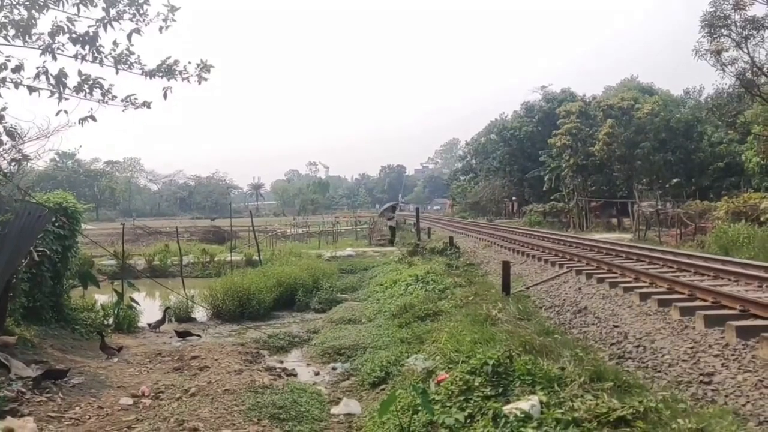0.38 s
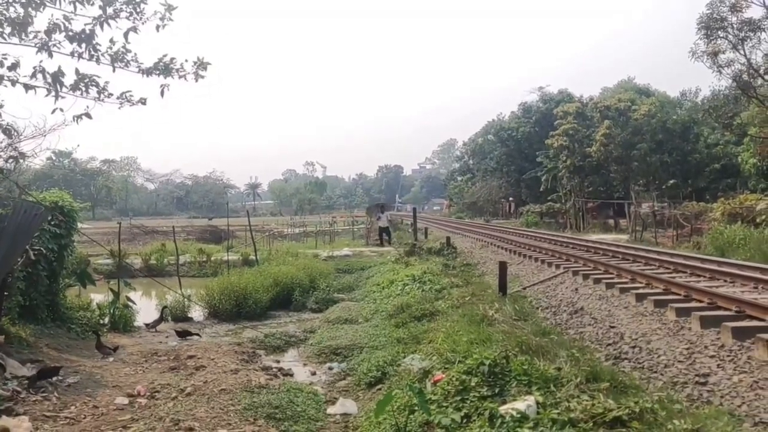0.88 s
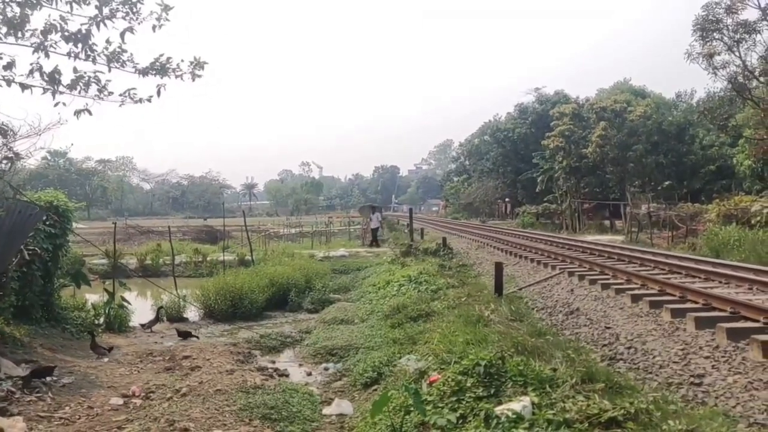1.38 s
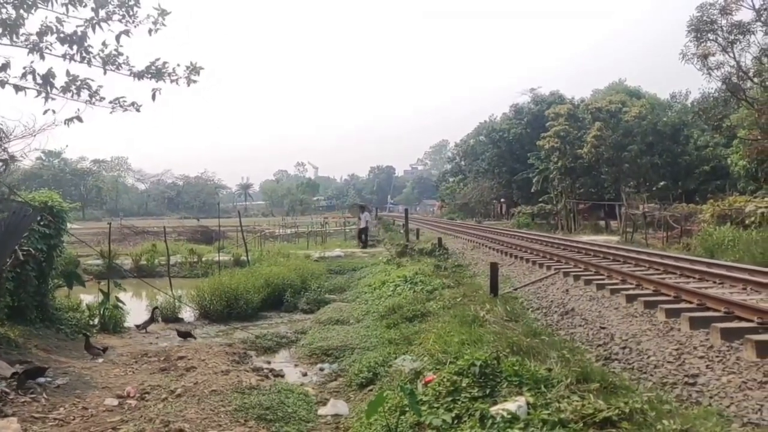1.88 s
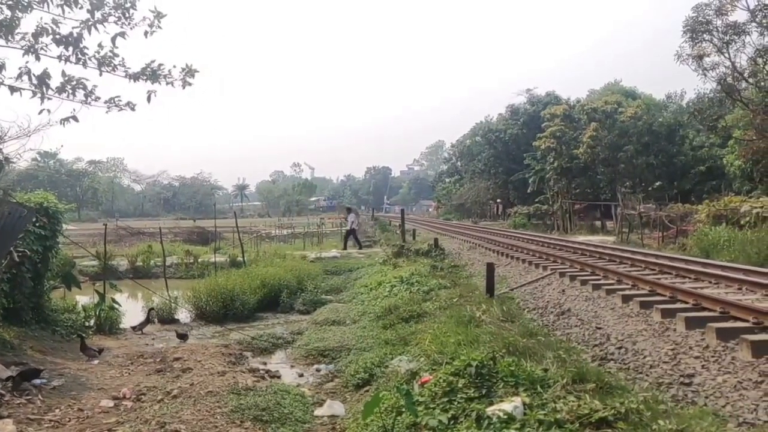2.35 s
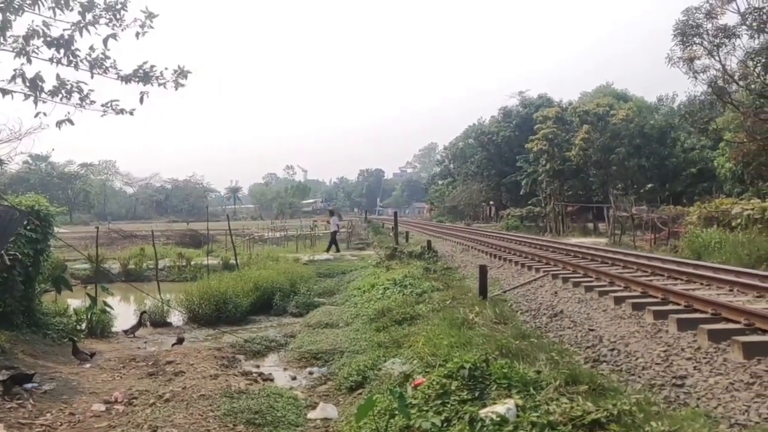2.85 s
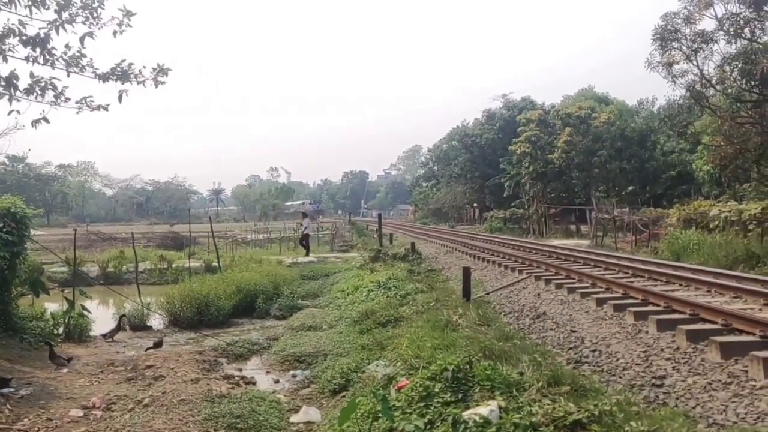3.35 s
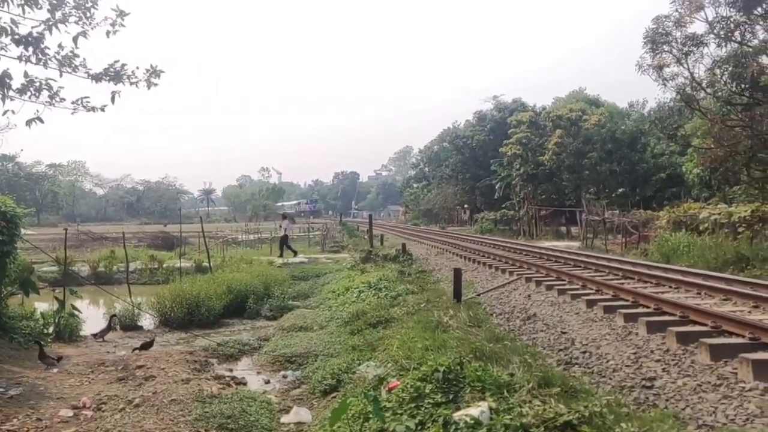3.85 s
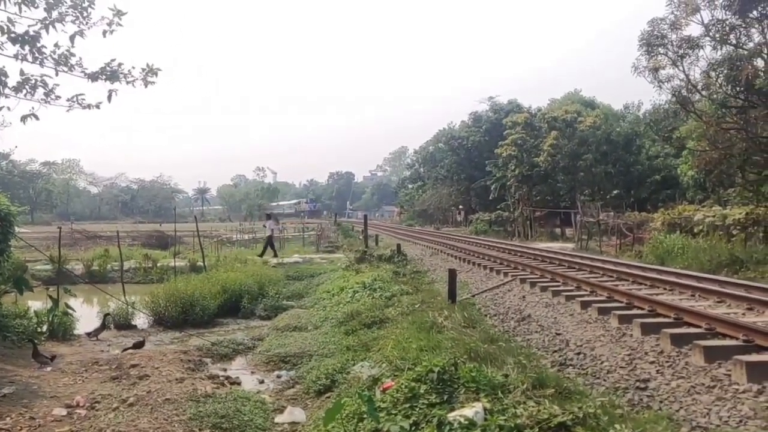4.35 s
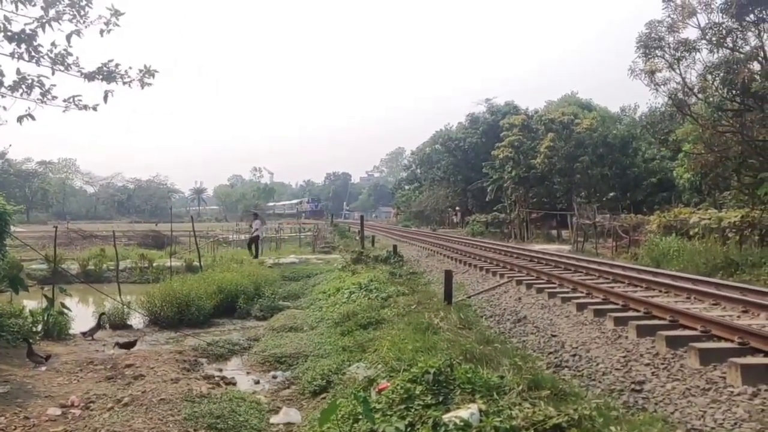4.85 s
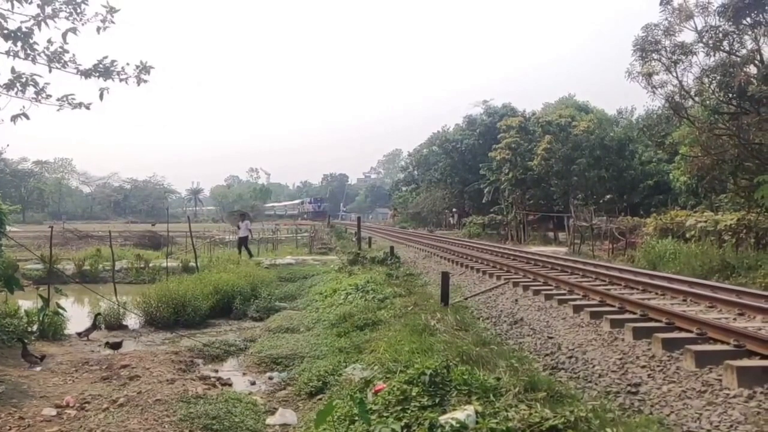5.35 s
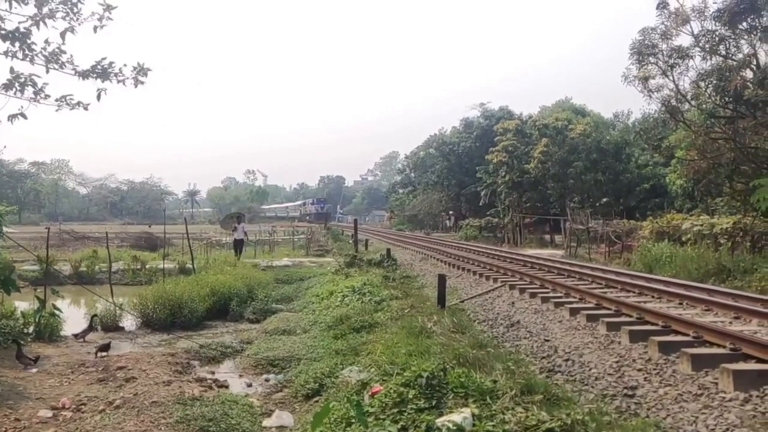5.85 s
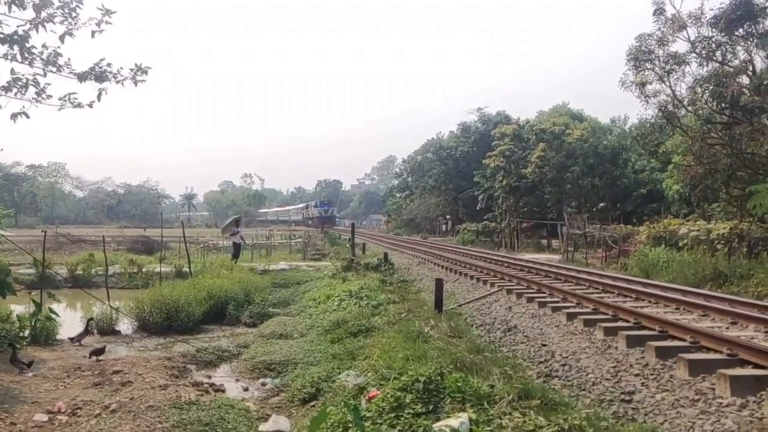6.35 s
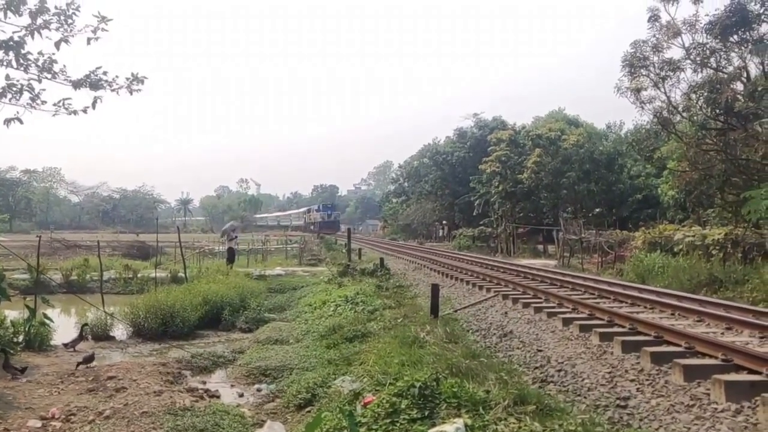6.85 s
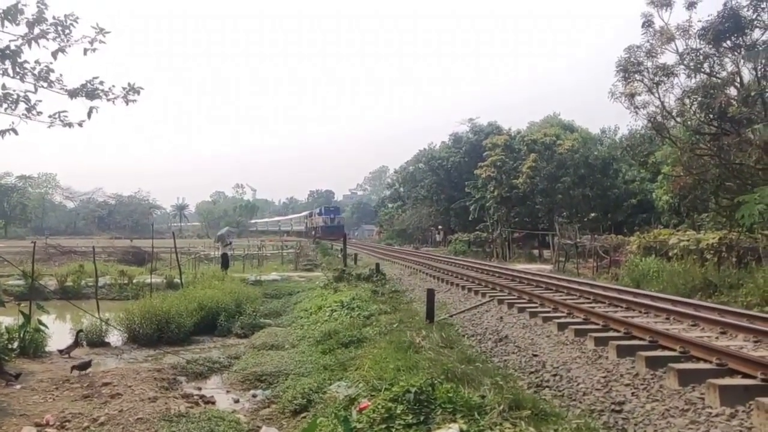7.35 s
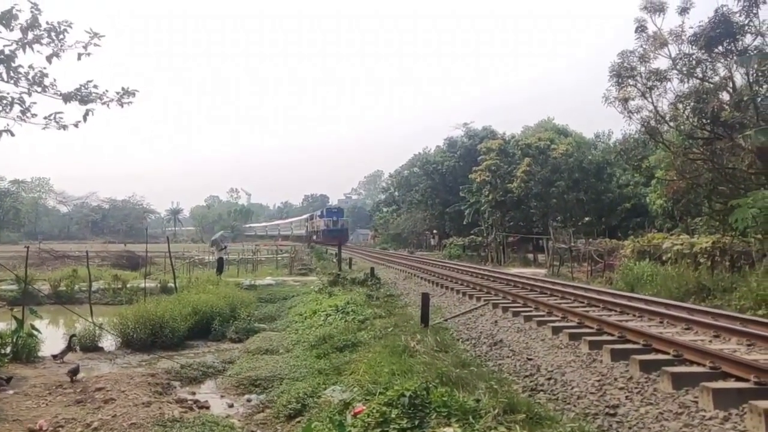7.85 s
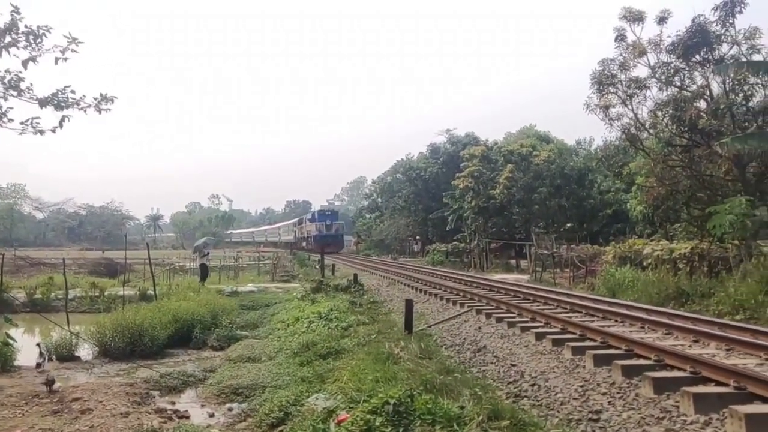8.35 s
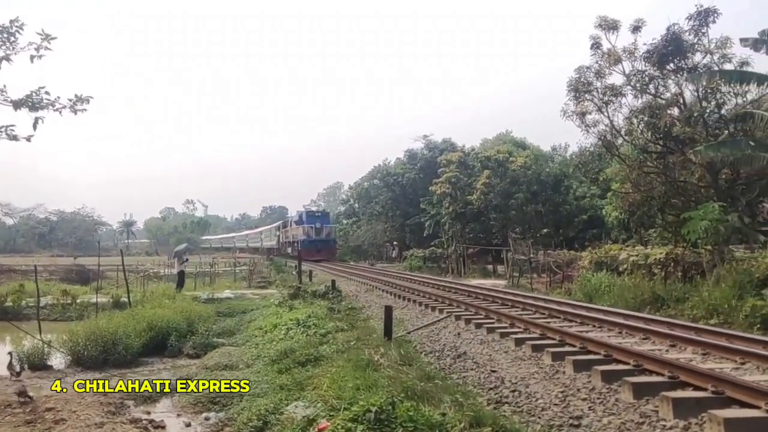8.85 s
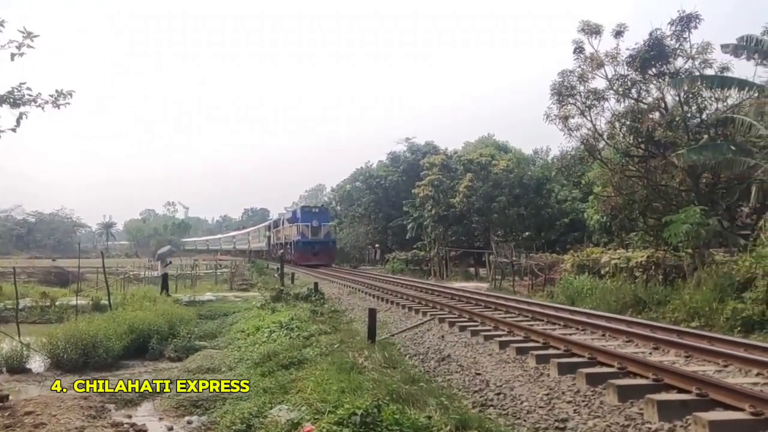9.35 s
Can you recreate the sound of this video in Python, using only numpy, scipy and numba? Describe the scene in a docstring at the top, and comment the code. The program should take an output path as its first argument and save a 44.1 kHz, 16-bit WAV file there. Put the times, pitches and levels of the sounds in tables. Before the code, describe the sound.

A bright, reedy train horn on a steady pitch dominates an open wet field. Long blasts alternate with clipped toots, each starting sharply with a slight downward settle and ending abruptly into a diffuse, partly lower-pitched echo. In the gaps, shrill insect ringing swells above a faint low diesel hum. One soft bump on the microphone and a brief grassy crackle are close; the train remains distant, with background thinned by noise suppression.

```python
"""An air horn sounds long and short blasts from a diesel locomotive approaching over open wet fields.
Its partials are summed pulse by pulse and shimmer in the air; trees return them as a smear of noise,
mostly at the same and lowered pitches. The engine drones as noise plus a wavering tone, and insects are
crowds of ringing clicks; these surroundings sink under most blasts and come back after them.
A soft bump and dry rustles close by are single decaying bursts."""
import sys
import numpy as np
from scipy import signal
from scipy.io import wavfile
from scipy.ndimage import uniform_filter1d
from numba import njit

SR = 44100
rng = np.random.default_rng(int(sys.argv[2]) if len(sys.argv) > 2 else 0)


def to_wav(sig):
    """Store sig (one row per channel, or 1-D mono) as 16-bit WAV at the path in sys.argv[1].

    Samples outside -1..1 are clipped; the rate is SR.
    """
    pcm = np.clip(np.atleast_2d(sig), -1, 1) * 32767
    pcm = np.round(pcm).astype(np.int16)
    wavfile.write(sys.argv[1], SR, pcm.T)  # frames by channels


def volts_from_db(level):
    """Convert decibel levels to linear amplitude ratios."""
    exponent = np.asarray(level, float) / 20
    return 10 ** exponent


N = 417186
TIME = np.arange(N) / SR


def evened(x):
    """Scales to rms 1."""
    return x / np.sqrt(np.mean(abs(x) ** 2) + 1e-20)


def read(points, hz, axis=1):
    """Reads one column of a table on a log-frequency axis."""
    table = np.transpose(points)
    return np.interp(np.log(hz + 1), np.log(table[0] + 1), table[axis])


def curve(rows, t):
    """Reads a (time, value) curve."""
    return np.interp(t, *np.transpose(rows))


def panned(db):
    """Left and right gains for a level difference."""
    return volts_from_db(np.array([db, -db]) / 2)


def swell(rate_hz):
    """Slow random movement of rms 1: twenty sines up to rate_hz."""
    t = TIME[::200]
    sines = [np.sin(2 * np.pi * (f * t + rng.random())) for f in rate_hz * np.geomspace(.1, 1, num=20)]
    return np.interp(TIME, t, evened(sum(sines)))


def wander(frames, step_s, rate_hz):
    """Complex random movement, one line per partial, mostly below rate_hz."""
    z = rng.standard_normal((frames, len(BELL), 2)) @ [1, 1j]
    lowpass = signal.butter(2, rate_hz, fs=1 / step_s, output="sos")
    # a mirrored run-in lets the filter settle
    return evened(signal.sosfilt(lowpass, np.vstack([z[::-1], z]), axis=0)[frames:])


def frame_axes(size):
    """Bin frequencies and frame times of the short-time transform."""
    return np.fft.rfftfreq(size, 1 / SR), np.arange(4 * N // size + 5) * size / 4 / SR


def paired_noise(magnitude, same):
    """Two channels of noise from a bins x frames magnitude and a left-right likeness per bin."""
    a, b, c, d = rng.standard_normal((*magnitude.shape[::-1], 4)).T
    same = np.clip(same, -1, 1)[:, None]
    left = a + 1j * b
    right = same * left + np.sqrt(1 - same ** 2) * (c + 1j * d)
    return np.array([left, right]) * magnitude


def to_sound(z):
    """Inverse short-time transform, 75% overlap."""
    size = 2 * (z.shape[1] - 1)
    return signal.istft(z, nperseg=size, noverlap=size * 3 // 4)[1][:, :N]


# horn blasts: (valve opens [s], valve shuts [s], settled pitch [Hz], pitch overshoot [share],
# sinking of the surroundings [dB])
BLASTS = [(-1, 1.93, 340, .03, 4), (3.485, 3.57, 340.5, .03, 0), (3.67, 6.355, 339.6, .015, 9),
          (7.318, 7.53, 340, .036, 17), (7.762, 7.885, 340.4, .03, 18), (8.09, 9.6, 339.8, .03, 11)]
# tone colour of the horn's bell, relative within each group: (partial [number], level [dB])
BELL = [(1, -16), (2, -3), (3, 0), (4, -4), (5, -35), (6, -21), (7, -21), (8, -21.5), (9, -23.5),
        (10, -22.5), (11, -23), (12, -21), (13, -21.5), (14, -21), (15, -22), (16, -19), (17, -21),
        (18, -20), (19, -21), (20, -21), (21, -24), (22, -24.5), (23, -26), (24, -23), (25, -27.5),
        (26, -23), (27, -38), (28, -24), (29, -27), (30, -23), (31, -31.5), (32, -24.5), (33, -30),
        (34, -28.5), (35, -35), (36, -36), (37, -35), (38, -33), (39, -37), (40, -38), (41, -35), (42, -35),
        (43, -38), (44, -40), (45, -37), (46, -36)]
# groups of partials that move together: (highest partial of the group [number])
GROUP_TOP = [1, 2, 3, 4, 12, 26, 35, 46]
# the three strongest partials drift in balance and weaken on the way:
# (time [s], 2nd partial level [dB], 3rd partial level [dB], 4th partial level [dB])
BODY = [(0, -11, -17, -15.5), (.4, -12, -15.5, -15.5), (.8, -10.5, -15, -16), (1.17, -12.5, -15.5, -21),
        (1.46, -15, -14.5, -23), (1.93, -16, -14, -18), (3.5, -13, -12, -21.5), (4.1, -14, -12, -22),
        (4.46, -12.5, -10, -15), (5.09, -17, -14.5, -15.5), (5.3, -19, -13, -13.5), (6.0, -17, -14, -20.5),
        (6.36, -18.5, -14, -19), (7.33, -19, -16.5, -17), (7.53, -24, -18, -24), (7.78, -22, -19, -25),
        (7.89, -25, -25, -29), (8.1, -22, -21.5, -23), (8.85, -22.5, -21.5, -25), (9.46, -19.5, -19, -23)]
# partials 5-12 together: (time [s], level [dB])
MIDDLE = [(0, -20), (.5, -19.5), (1, -21.5), (1.9, -22), (3.55, -21.5), (4.4, -23.5), (5.1, -21.5),
          (6.0, -24), (7.4, -23), (8.2, -24), (8.7, -20.5), (9.46, -21)]
# the treble opens as the train nears, in waves:
# (time [s], partials 13-26 level [dB], partials 27-35 level [dB])
TREBLE = [(0, -28.5, -45), (.5, -24.5, -46), (.9, -25, -40), (1.2, -21, -33), (1.5, -16.5, -32),
          (1.9, -15.5, -33), (3.5, -25, -46), (3.9, -28.5, -40), (4.72, -23.5, -35), (5.2, -26.5, -33),
          (6.0, -20.5, -34.5), (7.35, -23, -30), (7.8, -19.5, -30), (8.5, -25.5, -29), (8.8, -25, -25.5),
          (9.46, -19.5, -24)]
# partials 36-46, whose level is heard jumping up and down at random: (time [s], level [dB])
TOP_JUMPS = [(0, -65), (.59, -66), (.63, -42), (1.0, -38), (1.5, -48), (1.9, -37), (3.71, -42), (3.75, -30),
             (4.2, -32), (4.7, -44), (5.15, -36), (6.1, -46), (7.33, -37), (9.1, -43), (9.46, -34)]
FIRST_DB = -28.5  # steady level of the lowest partial
ATTACK_S, TREBLE_LAG = .007, .01  # base rise as pressure builds; each higher partial rises more slowly
# fall after the valve shuts: dB reached after RELEASE_S, made steeper up high by TREBLE_DROP
RELEASE_S, RELEASE_DB, RELEASE_BEND, TREBLE_DROP = .05, -18, 1.2, .12


def partial_db(t):
    """Level of each partial (time x partials): bell shape within each group, group level, valve."""
    order, bell_db = np.transpose(BELL)
    group = np.searchsorted(GROUP_TOP, order)
    group_power = np.bincount(group, volts_from_db(2 * bell_db))
    bell_db = bell_db - 10 * np.log10(group_power)[group]
    levels = [FIRST_DB + 0 * t]
    for table in (BODY, MIDDLE, TREBLE, TOP_JUMPS):
        s, *columns = np.transpose(table)
        levels += [np.interp(t, s, db) for db in columns]
    levels = np.transpose(levels)
    valve = np.zeros((len(t), len(order)))
    for opens, shuts, *rest in BLASTS:
        rise = np.clip((t[:, None] - opens) / (ATTACK_S * (1 + TREBLE_LAG * order)), 0, 1)
        since_shut = np.maximum(t - shuts, 0)[:, None]
        fall_db = RELEASE_DB * (since_shut / RELEASE_S) ** RELEASE_BEND * order ** TREBLE_DROP
        valve = np.maximum(valve, rise * volts_from_db(fall_db))
    return levels[:, group] + bell_db + 20 * np.log10(valve + 1e-6)


@njit
def stack(turns, gains, hop):
    """Sums the partials of one phase, each with its slowly moving complex gain per channel."""
    out = np.zeros((2, len(turns)))
    for i in range(len(turns)):
        j, u, step = i // hop, (i % hop) / hop, np.exp(2j * np.pi * turns[i])
        for c in range(2):
            spin = step
            for k in range(gains.shape[2]):
                out[c, i] += (spin * (gains[c, j, k] + u * (gains[c, j + 1, k] - gains[c, j, k]))).imag
                spin *= step
    return out


# shape of the air-scattered sound against the direct, before gains: (frequency [Hz], level [dB])
SHIMMER = [(340, -19), (1000, -16), (2000, -4), (5000, -4), (15000, 2)]
# stereo balance of the horn: (frequency [Hz], left minus right [dB])
HORN_PAN = [(60, -1.0), (130, 0.0), (290, -0.5), (640, -1.0), (1410, -2.5), (3100, 3), (6820, 0),
            (15000, 17.5)]
# stereo phase of the horn: (frequency [Hz], left lead [rad])
HORN_LEAD = [(700, 0), (1000, -.5), (2000, -.5), (4000, -1.1), (8000, -1.2), (15000, -3)]
HORN_HZ, SETTLE_S = 340, .038  # nominal pitch; time constant of the pitch overshoot


def horn(hop=128):
    """A beating diaphragm: sharp regular pulses whose partials fade in and out along the turbulent path."""
    t = np.arange(N // hop + 2) * hop / SR
    frames, step_s = len(t), hop / SR
    order = np.transpose(BELL)[0]
    hz, unsteady = np.zeros(N), np.zeros(frames)
    for opens, shuts, settled_hz, overshoot, sink_db in BLASTS:
        since = TIME - opens
        glide_hz = settled_hz * (1 + overshoot * np.exp(-abs(since) / SETTLE_S))
        hz[since >= 0] = glide_hz[since >= 0]
        unsteady += np.exp(-abs(t - opens) / 0.053)  # the first beats are ragged
    partial_hz = HORN_HZ * order
    scatter = volts_from_db(read(SHIMMER, partial_hz))
    shared = wander(frames, step_s, 2.35)
    own = [wander(frames, step_s, 1.96) for side in range(2)]
    # eddies roughen each line in gusts
    gusts = abs(wander(frames, step_s, 4.0)) ** 1.5
    flutter = 0.27 * scatter * wander(frames, step_s, 43.0) * gusts
    ragged = 0.72 * unsteady[:, None] * np.minimum(order / 6.4, 1) * wander(frames, step_s, 150.0)
    path = np.array([1 + scatter * (0.91 * shared + 1.0 * side) + flutter for side in own])
    path = path / np.sqrt(1 + scatter ** 2) + ragged
    lead = np.exp(.5j * np.outer([1, -1], read(HORN_LEAD, partial_hz)))
    held_back = np.exp(-1.4j * np.maximum(5 - order, 0) ** 2)  # the bell delays its lowest partials
    stereo = (panned(read(HORN_PAN, partial_hz)) * lead * held_back)[:, None]
    gains = np.sqrt(2) * volts_from_db(partial_db(t)) * path * stereo
    return stack(np.cumsum(hz) / SR, gains, hop)


# slow level of the surroundings: (time [s], level [dB])
AROUND = [(0, -31.5), (.7, -32), (1.6, -29), (2.05, -30.5), (2.5, -29.5), (3.48, -30.5), (3.7, -24),
          (3.87, -26), (4.6, -25.5), (5.1, -29.5), (6, -31), (6.4, -27), (6.75, -29), (7.31, -25),
          (8.1, -26.5), (8.5, -31), (9.46, -32)]
SINK_S, HOLD_S, RETURN_S = .025, .095, .045  # they sink, stay down past the blast, come back


def around_db(t):
    """Slow level of the surroundings, lowered by each blast's own amount while it sounds."""
    sunk = []
    for opens, shuts, hz, overshoot, sink_db in BLASTS:
        corners = [opens, opens + SINK_S, shuts + HOLD_S, shuts + HOLD_S + RETURN_S]
        sunk.append(sink_db * np.interp(t, corners, [0, 1, 1, 0]))
    return curve(AROUND, t) - np.max(sunk, axis=0)


# echoes off trees all round a moving horn: (pitch against the direct [share], relative level [dB])
DOPPLER = [(0.891, -81), (.902, -24), (0.909, -8.5), (.92, -24.5), (.93, -21), (.96, -27), (.994, -17),
           (1.001, 3.5), (1.007, -28), (1.062, -26), (1.1, -70)]
# colour and ring of the trees: (frequency [Hz], relative level [dB], decay by 60 dB [s])
ECHO = [(296, -0.5, 1.95), (690, -10.5, 1.9), (1400, -11.5, 2.8), (3000, -9, 2), (6160, -9.5, 0.65),
        (15000, -26, .6)]


def echoes(size=4096, lag_s=0.058):
    """Trees return each partial as a smear of shifted pitches that dies away band by band."""
    hz, t = frame_axes(size)
    share, share_db = np.transpose(DOPPLER)
    smear = np.array([volts_from_db(2 * np.interp(hz / (k * HORN_HZ), share, share_db)) / k for k, db in BELL])
    # scene() applies the surroundings' level, so it is taken out of what is sent
    sent_db = partial_db(np.maximum(t - lag_s, 0)) - around_db(t - lag_s)[:, None]
    sent = volts_from_db(2 * sent_db) @ smear
    keep = volts_from_db(-120 * t[1] / read(ECHO, hz, axis=2))  # power kept from frame to frame
    held = sent.copy()
    for j in range(1, len(t)):
        held[j] = keep * held[j - 1] + (1 - keep) * sent[j]
    magnitude = volts_from_db(read(ECHO, hz))[:, None] * np.sqrt(held.T)
    # (frequency [Hz], left-right likeness [share])
    likeness = read([(300, 0.93), (1100, 0.2), (2000, 0.3), (8000, 0.68)], hz)
    return to_sound(paired_noise(magnitude, likeness))


# spectrum shape of distant train and field murmur: (frequency [Hz], relative density [dB per Hz])
FIELD = [(20, -11), (42, -17), (52, -2), (62, -21), (100, -15.5), (130, -14.5), (200, -26), (300, -30),
         (560, -35), (680, -26), (1000, -28), (1100, -32), (2000, -35.5), (3000, -39.5), (6100, -36),
         (7500, -66)]
# width of the murmur: (frequency [Hz], left-right likeness [share])
FIELD_SAME = [(30, .5), (75, .95), (140, 0.8), (300, .6), (1600, 0.17), (5000, 0)]
# stereo balance of the murmur and the insects: (frequency [Hz], left minus right [dB])
FIELD_PAN = [(60, -1), (150, -0.5), (380, 0.5), (950, -0.5), (2380, 0.0), (5980, 1.5), (15000, 12)]
# centre pitch of the exhaust drone: (time [s], frequency [Hz])
FIRING = [(0, 81), (3, 79.2), (6.5, 77.7), (7.3, 74), (7.8, 69), (9.46, 70)]
HUM_DB, HUM_WAVER_DB = -2.5, 2  # steady core of the drone against rms 1, and its rms waver


def train(size=4096):
    """Exhaust drone as a wavering low tone and a narrow noise band over a broad murmur."""
    hz, t = frame_axes(size)
    drone = volts_from_db(-7) / (1 + ((hz[:, None] - curve(FIRING, t)) / 6.2) ** 4)
    z = paired_noise(volts_from_db(read(FIELD, hz))[:, None] + drone, read(FIELD_SAME, hz))
    murmur = volts_from_db(-1.2) * evened(to_sound(z * panned(read(FIELD_PAN, hz))[:, :, None]))
    hum_hz = curve(FIRING, TIME) + 1.5 * swell(5)
    hum = np.sin(2 * np.pi * np.cumsum(hum_hz) / SR)
    return murmur + np.sqrt(2) * volts_from_db(HUM_DB + HUM_WAVER_DB * swell(18)) * hum


# insect chorus against the surroundings, before each kind's own level:
# (time [s], low and broad-band singers level [dB], narrow high-band singers level [dB])
INSECTS = [(0, -26, -34), (.58, -26, -34), (.65, -16, -20), (1.9, -15, -18), (2.1, -11, -2), (2.48, -7, -3),
           (2.75, -24, -20), (3.08, -11, -5), (3.46, -14, -11), (3.75, -19, -22), (6.3, -15, -18),
           (6.55, -4, -2), (7.25, -3, 0), (7.4, -7, -9), (8.1, -7, -10), (9.46, -9, -16)]
# kinds of singer, low, broad-band and narrow high-band:
# (band bottom [Hz], band top [Hz], click spread [dB], level added to the chorus [dB])
SINGERS = [(6450, 7120, 1.5, -1), (9250, 15500, 1.5, 3), (13600, 15000, 2.4, 1)]
SWELL_DB, SWELL_HZ = 2.5, 6  # rms depth and fastest rate of the random swelling


def insects():
    """Crowds of tiny clicks, each kind ringing in its own band and swelling at random."""
    s, low_and_broad, narrow_high = np.transpose(INSECTS)
    choruses = (low_and_broad, low_and_broad, narrow_high)
    out = np.zeros((2, N))
    for (low_hz, high_hz, spread_db, db), chorus_db in zip(SINGERS, choruses):
        strength = volts_from_db(spread_db * rng.exponential(1, (3, N)))
        sparse = rng.random((3, N)) < .15
        clicks = rng.standard_normal((3, N)) * strength * sparse
        band = signal.butter(6, [low_hz, high_hz], "band", fs=SR, output="sos")
        # the third row of clicks is common to both sides
        rung = evened(signal.sosfilt(band, clicks[:2] + 0.58 * clicks[2]))
        level_db = np.interp(TIME, s, chorus_db) + db + SWELL_DB * swell(SWELL_HZ)
        out += rung * volts_from_db(level_db) * panned(read(FIELD_PAN, (low_hz + high_hz) / 2))[:, None]
    return out


# soft bumps on the microphone: (time [s], starting level [dB], pitch [Hz], decay by 60 dB [s])
THUMPS = [(0.36, -19, 130, 0.1)]


def bumps():
    """A dull bump: a low sine dying away."""
    out, t = np.zeros((2, N)), np.arange(4000) / SR
    for s, db, hz, t60 in THUMPS:
        out[:, round(s * SR):][:, :4000] += volts_from_db(db - 60 * t / t60) * np.sin(2 * np.pi * hz * t)
    return out


# grass rustles close by:
# (time [s], noise level before filtering [dB], left minus right [dB], decay by 60 dB [s])
CRACKLES = [(2.452, -22, 5, .08), (2.47, -16, 9, .04)]


def rustles():
    """Dry grass: bursts of filtered noise with a quick fade-in and decay."""
    out, t = np.zeros((2, N)), np.arange(4000) / SR
    for s, db, pan_db, t60 in CRACKLES:
        grain = np.diff(uniform_filter1d(rng.standard_normal(4001), size=3))
        snap = grain * volts_from_db(db - 60 * t / t60) * np.minimum(t / .003, 1)
        out[:, round(s * SR):][:, :4000] += panned(pan_db)[:, None] * snap
    return out


def scene():
    """The horn in front; echoes, train and insects share one level; bump and rustles close by."""
    surroundings = volts_from_db(around_db(TIME)) * (echoes() + train() + insects())
    return horn() + surroundings + bumps() + rustles()


# deepest suppression: (frequency [Hz], gain [dB])
CUT = [(250, -2), (500, -10), (800, -3), (1800, -28), (6200, -28), (7200, -8)]


def suppressed(x, reach=24, under_db=-20.0):
    """Noise suppressor: turns down whatever lies far under the strong tones within reach [bins]."""
    hz, t, z = signal.stft(x, SR, nperseg=2048, noverlap=1536)
    power = uniform_filter1d(abs(z) ** 2, size=3, axis=2)
    nearby = uniform_filter1d(power, size=2 * round(reach) + 1, axis=1)
    ratio = (power / (volts_from_db(2 * under_db) * nearby + 1e-20)) ** 2
    return to_sound(z * (ratio + volts_from_db(read(CUT, hz))[:, None]) / (ratio + 1))


def low_pass(x):
    """Removes everything above the highest recorded frequency."""
    return signal.sosfilt(signal.butter(12, 15810, fs=SR, output="sos"), x)


def record(dry):
    """Noise suppressor, band limit and full-scale ceiling make the finished mix."""
    band = signal.firwin(511, 15800, window=("kaiser", 9), fs=SR)
    limited = signal.oaconvolve(suppressed(dry), band[None], "same")
    mix = np.clip(limited, -1, 1)
    return low_pass(mix)


dry = scene()
out = record(dry)
to_wav(out)
```